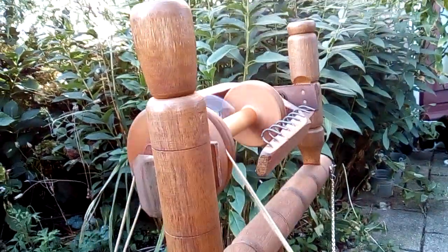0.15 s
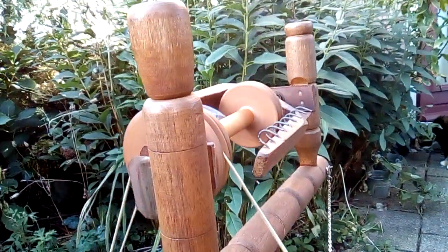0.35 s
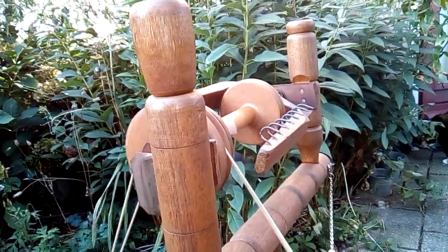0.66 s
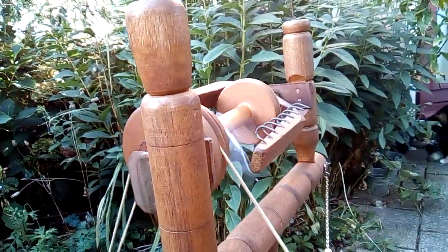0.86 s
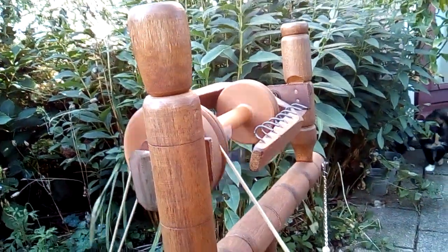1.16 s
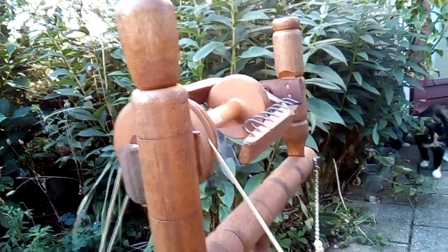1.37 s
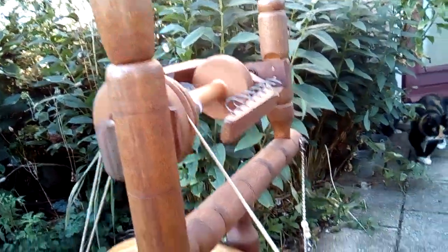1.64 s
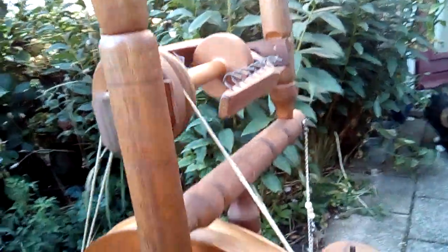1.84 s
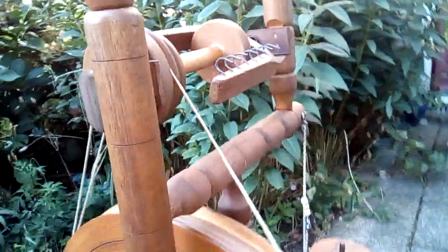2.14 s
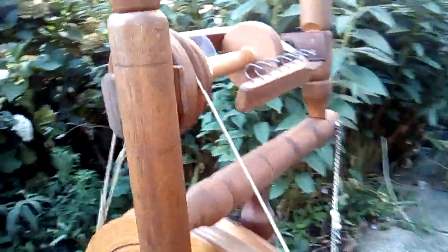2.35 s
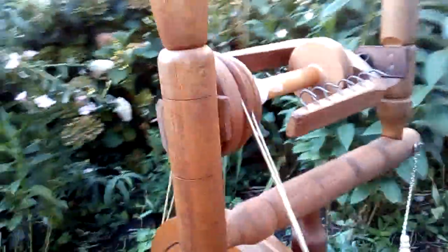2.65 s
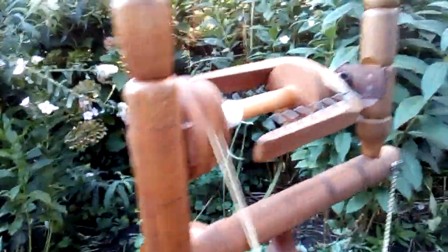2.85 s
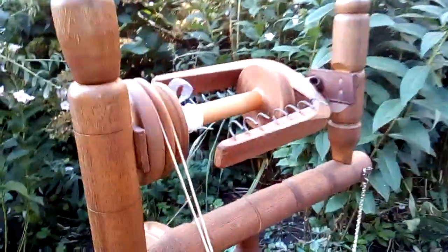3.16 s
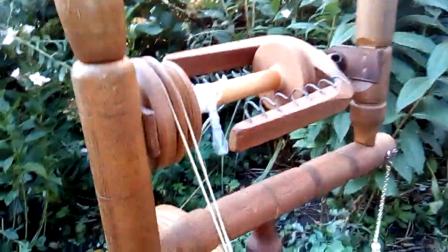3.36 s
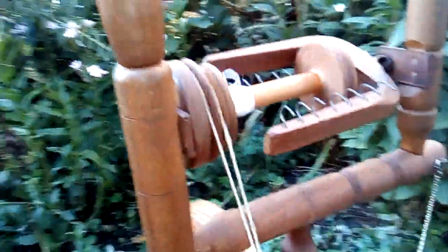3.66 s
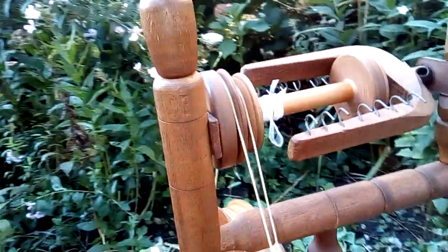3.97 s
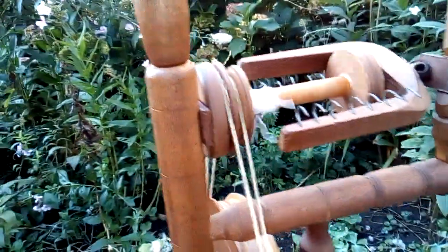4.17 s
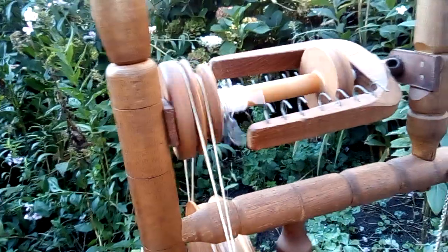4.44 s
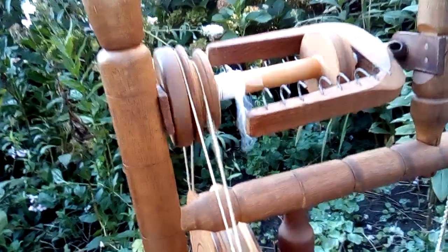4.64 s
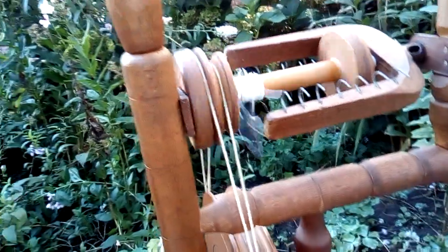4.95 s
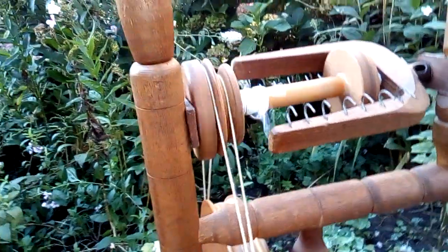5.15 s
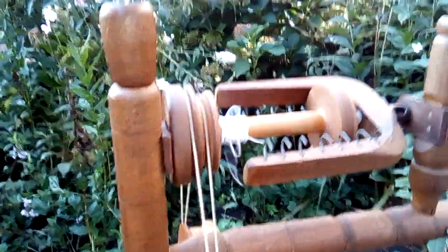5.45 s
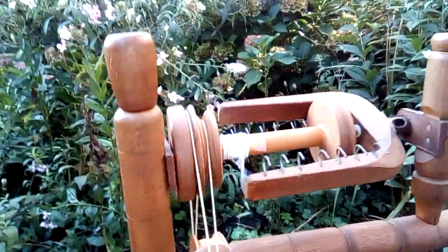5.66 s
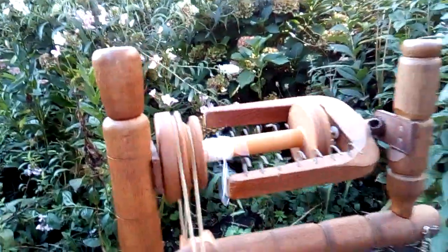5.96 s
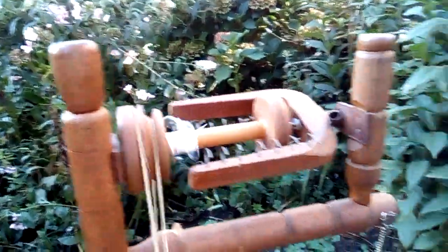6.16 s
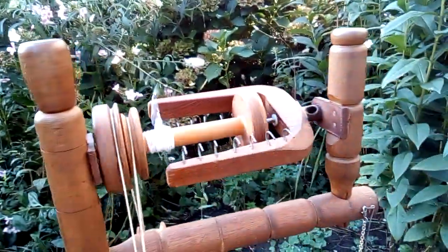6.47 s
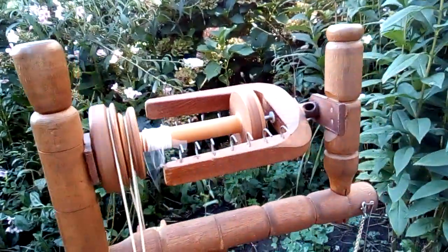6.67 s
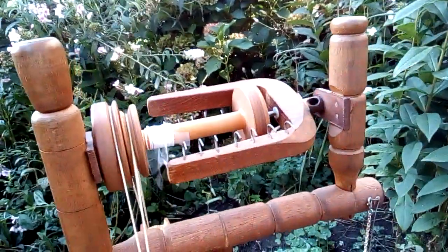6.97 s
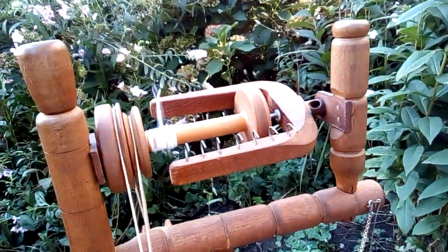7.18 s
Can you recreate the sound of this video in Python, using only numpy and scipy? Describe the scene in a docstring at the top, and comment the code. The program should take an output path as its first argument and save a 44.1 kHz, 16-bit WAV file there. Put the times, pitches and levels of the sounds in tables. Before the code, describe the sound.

Rhythmic dry wooden knocks and wiry ticks repeat about four times a second, slowing then quickening, over soft rubbing and faint distant rumble.

```python
"""Spinning wheel in a garden

A wooden spinning wheel runs close to a hand-held phone. Once a turn the loose bobbin rattles on its shaft: a heavy
blow and lighter ticks, a third of them in most turns, ring decaying modes of wood and wire hooks over soft rubbing.
The frame hums as throbbing resonant noise, bearings squeak as fluttering sines, and low cycles thump through the hand.
A shoe scuffs the paving in grainy noise, with brief treble clicks and crackle; far traffic and hiss are shaped noise."""
import sys
import numpy as np
from scipy import signal
from scipy.fft import rfft, irfft
from scipy.io import wavfile
from scipy.ndimage import uniform_filter1d

SR = 44100
rng = np.random.default_rng(int(sys.argv[2]) if len(sys.argv) > 2 else 0)


def inscribe(sig):
    """Save sig as 16-bit PCM at rate SR to the path in sys.argv[1].

    A 1-D sig is mono; a 2-D sig holds one channel per row.
    Samples are clipped to [-1, 1] before scaling.
    """
    pcm = np.round(np.clip(np.atleast_2d(sig).T, -1, 1) * 32767)
    wavfile.write(sys.argv[1], SR, pcm.astype(np.int16))


N = 322371
T = np.arange(N) / SR


def undb(db):
    """Decibels to amplitude ratio."""
    return 10 ** (np.asarray(db) / 20)


def unit(x):
    """Scale to rms 1."""
    return x / np.sqrt(np.mean(x ** 2))


def ring(x, hz, t60):
    """One mode decaying 60 dB in t60 seconds; a unit click starts a sine of height 1."""
    r, w = np.exp(-np.log(1000) / (t60 * SR)), 2 * np.pi * hz / SR
    return signal.lfilter([0, np.sin(w)], [1, -2 * r * np.cos(w), r * r], x)


def coloured(points):
    """Noise of rms 1 with the given spectrum, interpolated over log frequency."""
    hz, db = np.transpose(points)
    f = np.maximum(np.fft.rfftfreq(N, 1 / SR), 1)
    gain = undb(np.interp(np.log(f), np.log(hz), db))
    return unit(irfft(rfft(rng.standard_normal(N)) * gain, N))


def walk(rate):
    """Random levels held 1 / rate seconds and smoothed twice; rms 1."""
    k = int(SR / rate)
    steps = np.repeat(rng.standard_normal(N // k + 1), k)
    return unit(uniform_filter1d(uniform_filter1d(steps, k), k)[:N])


def swell(s, rise_ms, fall_ms):
    """Bell-shaped envelope with its own rise and fall widths."""
    width_ms = np.where(T < s, rise_ms, fall_ms)
    return np.exp(-((T - s) / width_ms * 1000) ** 2 / 2)


def body(force, modes, t60):
    """Modes of alternating sign, with the far skirts cut away as a soft wooden contact does."""
    out = sum((-1) ** k * undb(db) * ring(force, hz, t60) for k, (hz, db) in enumerate(modes))
    edges = [modes[0][0] / 1.25, modes[-1][0] * 1.3]
    return signal.sosfilt(signal.butter(2, edges, "bandpass", fs=SR, output="sos"), out)


CONTACTS_PER_S = 1500


def contacts(size, spread_db):
    """Scattered tiny impacts of either sign, a few far stronger than the rest."""
    falls = rng.random(size) < CONTACTS_PER_S / SR
    strength = undb(spread_db * np.minimum(rng.exponential(size=size), 5))
    return falls * rng.choice([-1., 1.], size) * strength + 1e-9


def lean(hz, lift_db):
    """As the phone moves, the bobbin's note gains what the deepest mode loses, nearly in full."""
    return lift_db * ((hz == DEEP[1][0]) - 0.94 * (hz == DEEP[0][0]))


DETUNE = .015  # each knock shifts the modes by this random share


def knocks(modes, t60, at, level_db, chatter_ms, lift_db, scatter_db, first=0.38):
    """A knock is a first blow and a dying chatter of bounces; it strikes the modes in its own proportions."""
    ms = np.arange(3000) / SR * 1000
    out = np.zeros(N + len(ms))
    for s, db, fade, lift in zip(at, level_db, chatter_ms, lift_db):
        draws = rng.standard_normal((len(modes), 2))
        struck = [(hz * (1 + DETUNE * shift), gain_db + scatter_db * uneven + lean(hz, lift))
                  for (hz, gain_db), (uneven, shift) in zip(modes, draws)]
        fading = np.exp(-ms / fade - (ms / fade / 2) ** 2)
        onset = 1 - np.exp(-ms / 0.34)
        force = contacts(len(ms), spread_db=2.0) * fading * onset
        force[0] = first * np.sqrt(np.sum(force ** 2))
        knock = body(force, struck, t60)
        start = int(s * SR)
        # level every knock by its energy, reckoned over 4.7 ms
        out[start:start + len(ms)] += undb(db) * knock / np.sqrt(np.sum(knock ** 2) / (0.0047 * SR))
    return out[:N]


# levels of the wood, before the view from the phone is added
# One row a turn of the flyer: first_tick_s, heavy_blow_s, second_tick_s, rattle_rise_ms,
# first_tick_db, heavy_blow_db, second_tick_db, rattle_db
TURNS = [(0.039, 0.086, 0.099, 17, -46, -39, -42.5, -51.5),
         (0.267, 0.323, 0.39, 1.8, -47.5, -38.5, -52, -45.5),
         (0.572, 0.631, 0.73, 2, -50, -39.5, -62, -53.5), (0.845, 0.893, 0.944, 2.2, -56, -35.5, -46, -47),
         (1.081, 1.126, 1.177, 3.8, -40.5, -38, -38, -42.5),
         (1.313, 1.365, 1.403, 6.8, -47, -41, -34.5, -49.5),
         (1.561, 1.616, 1.663, 26, -39.5, -36.5, -47, -47.5),
         (1.844, 1.892, 1.957, 27, -44, -39.5, -49.5, -46),
         (2.154, 2.234, 2.27, 3.4, -49, -44.5, -43.5, -63),
         (2.455, 2.508, 2.576, 21.4, -47, -41.5, -42, -46.5),
         (2.772, 2.839, 2.9, 33, -47.5, -41, -47.5, -53.5),
         (3.259, 3.278, 3.325, 39, -49, -43, -57.5, -50.5), (3.561, 3.593, 3.633, 50, -54, -50, -72, -52),
         (3.933, 3.97, 4.03, 42, -57, -44, -53, -51), (4.356, 4.423, 4.488, 43, -59, -40.5, -46.5, -51),
         (4.66, 4.702, 4.752, 22, -44.5, -39, -46.5, -49.5), (4.892, 4.934, 4.98, 29, -48, -36.5, -50, -48),
         (5.119, 5.163, 5.208, 29, -48, -38, -46.5, -46.5),
         (5.354, 5.394, 5.446, 29, -47.5, -41, -49.5, -48.5),
         (5.593, 5.644, 5.7, 25.5, -62.5, -40, -53, -47),
         (5.831, 5.868, 5.95, 29, -46.5, -36.5, -57.5, -46.5),
         (6.039, 6.076, 6.115, 15.6, -46.5, -38, -45, -46.5),
         (6.239, 6.275, 6.313, 27, -47, -39, -38.5, -45), (6.44, 6.464, 6.518, 10, -42, -38.5, -49, -46),
         (6.64, 6.669, 6.723, 20.5, -50, -42, -70, -47.5),
         (6.851, 6.883, 6.93, 24, -41.5, -36, -50.5, -47.5),
         (7.053, 7.087, 7.127, 24, -39.5, -45, -55, -51.5), (7.244, 7.273, 7.3, 15, -40, -44, -58, -46.5)]
# The third tick, in the lull after the rattle, heard in most turns: start_s, level_db
THIRD_TICKS = [(0.16, -50.5), (0.488, -46), (0.999, -48.5), (1.235, -38), (2.048, -43.5), (2.356, -51),
               (2.658, -49.5), (3.777, -54), (4.214, -48.5), (4.818, -48), (5.048, -46), (5.276, -49.5),
               (5.516, -46), (5.756, -51), (5.971, -48.5), (6.171, -41), (6.37, -48.5), (6.574, -44),
               (6.778, -44), (7.18, -43)]
# Loose bounces of the bobbin outside the pattern of the turn: start_s, level_db
BOUNCES = [(0.468, -55.5), (1.116, -48), (1.352, -50), (3.983, -63), (4.688, -50), (4.856, -51),
           (5.143, -49), (5.627, -48), (5.856, -49), (6.057, -49), (6.251, -54)]
# Hooks against wood, level_db for: first tick, heavy blow, second tick, third tick, bounce
HOOKS_AGAINST_WOOD_DB = [-7, -19, 0, -1.5, -8.5]
# How long the bobbin chatters, fade_ms for the same five kinds of knock
CHATTER_MS = [15.3, 11.7, 19.7, 18.5, 2.4]
# How far each family's rattle runs ahead, as a share of its rise: middle wood, deep wood, hooks
RATTLE_LEAD = [0, -0.51, 0.54]
# top of the rattle after the blow and its fall width, as shares of the way from first to second tick
RATTLE_LAG, RATTLE_FALL = 0.12, 0.28


def turns():
    """The bobbin's pattern: times, wood and hook levels and chatter of all knocks; rattle envelope of each family."""
    start, blow, second, rise_ms, first_db, blow_db, second_db, rattle_db = np.transpose(TURNS)
    kinds = [(start, first_db), (blow, blow_db), (second, second_db),
             np.transpose(THIRD_TICKS), np.transpose(BOUNCES)]
    at, wood_db = np.concatenate(kinds, axis=1)
    rows = [len(kind[0]) for kind in kinds]
    hooks_db = wood_db + np.repeat(HOOKS_AGAINST_WOOD_DB, rows)
    way = second - start
    tops = blow + RATTLE_LAG * way
    rattles = [sum(undb(db) * swell(s - lead * rise / 1e3, rise, 1e3 * RATTLE_FALL * span)
                   for s, rise, span, db in zip(tops, rise_ms, way, rattle_db))
               for lead in RATTLE_LEAD]
    return at, wood_db, hooks_db, np.repeat(CHATTER_MS, rows), rattles


# Modes of the middle wood, before detuning and scatter: pitch_hz, level_db
MIDDLE = [(1350, -2.5), (1600, -1.5), (1750, 1.5), (1860, 8.5), (2090, 0.5), (2350, -3.5)]
# Modes of the deep wood: pitch_hz, level_db
DEEP = [(530, -11.5), (760, -1.5), (975, -0.5), (1185, 0.5)]
# Modes of the wire hooks: pitch_hz, level_db
HOOKS = [(2830, 18.1), (3150, 17), (3620, 19.5), (3930, 15.8), (4530, 16.8), (4760, 12), (4990, 17.5),
         (5290, 16.6), (6300, 0.15)]
# Ring time of middle wood, deep wood, hooks: t60_s
RING_S = [0.016, 0.058, 0.021]
# How unevenly a contact shares its force among the modes of those three families: scatter_db
SCATTER_DB = [3.5, 4.5, 6.]
# Level of those three families in the rattle: level_db
RATTLE_SHARE_DB = [-1, 2.5, -8.5]
# Rubbing of shaft and drive band, and the wheel as heard from where the phone is:
# time_s, rubbing_db, deep_share_db, hooks_share_db, bobbin_note_lift_db (for the second deep mode)
WHIRR = [(0, -64.5, -12, -11, 7.5), (1.2, -58.5, -11.5, -9, 6.5), (2.602, -64.5, -7, -4.5, 6.5),
         (3.2, -70, -8, -8.5, 7.5), (3.75, -70, -6, -18, 2), (4.3, -70.5, -3.5, -2.5, -1),
         (4.9, -65, -6, -0.5, -3), (7.31, -58, -5, -0.5, -3)]
# One longer-ringing mode that the middle wood sets going: pitch_hz, level_db, t60_s
SHAFT_NOTE = (1767.6, -34.5, 0.026)


def wheel():
    """Close to the phone: knocks, rattles and soft rubbing excite each family of decaying modes."""
    out = 0
    uneven = undb(2.8 * walk(140))
    catching_db = 3.1 * np.tanh(walk(60))
    grit = contacts(N, spread_db=2.5)  # the same impacts ring both families of wood
    s, rubbing_db, deep_share_db, hooks_share_db, lift_db = np.transpose(WHIRR)
    at, wood_db, hooks_db, chatter_ms, rattles = turns()
    blows_db = [wood_db, wood_db, hooks_db]
    view_db = [0 * s, deep_share_db, hooks_share_db]
    shake_db = [0 * s, 0.95 * deep_share_db, hooks_share_db]
    lift = np.interp(T, s, lift_db)
    for k, (modes, share_db) in enumerate([(MIDDLE, 0), (DEEP, -5), (HOOKS, -6.5)]):
        # the point of contact wanders, so each mode comes and goes
        wander = [(hz, db + (SCATTER_DB[k] + 0.5) * np.tanh(1.73 * walk(45)) + lean(hz, lift))
                  for hz, db in modes]
        shake = rattles[k] * undb(RATTLE_SHARE_DB[k] + np.interp(T, s, shake_db[k]))
        rub_db = np.interp(T, s, rubbing_db + 0.62 * shake_db[k]) + share_db
        rub = undb(rub_db + catching_db + 3.1 * np.tanh(walk(25)))
        if modes is HOOKS:  # the wire hooks jingle on their own, the shortest ones most
            grit = contacts(N, spread_db=3.5)
            uneven = undb(4.84 * walk(70))
            wander = [(hz, db + 3.2 * (hz > 4200)) for hz, db in wander]
        push = shake * uneven + rub
        rms = np.std(body(grit, wander, RING_S[k]))
        level_db = blows_db[k] + np.interp(at, s, view_db[k])
        knock_lift_db = np.interp(at, s, lift_db)
        struck = knocks(modes, RING_S[k], at, level_db, chatter_ms, knock_lift_db, SCATTER_DB[k])
        family = struck + body(grit * push, wander, RING_S[k]) / rms
        if modes is MIDDLE:
            note_hz, note_db, note_t60 = SHAFT_NOTE
            family = family + undb(note_db) * ring(family, note_hz, note_t60)
        out = out + family
    # a faint spray of treble follows the hooks, the last family
    loudness = uniform_filter1d(np.abs(family), size=120)
    spray = loudness * unit(ring(rng.standard_normal(N), 10400.0, 0.0018))
    return out + undb(-32.0) * spray


# Low hum of the frame under the drive band, before its throbs: time_s, level_db
FRAME_HUM = [(0, -72.5), (1.2, -74), (2.9, -72), (3.9, -72.5), (4.6, -62.5), (5.5, -64.5), (7.31, -57.5)]
FRAME_HZ, FRAME_RING_S = 344.5, 0.044
FRAME_SHAKE_DB = -17  # how strongly the deep wood's rattle shakes the frame


def frame():
    """Noise through two resonances on one low note hums in uneven throbs, louder with each rattle."""
    hum = ring(ring(rng.standard_normal(N), FRAME_HZ, FRAME_RING_S), FRAME_HZ, 0.019)
    steady = undb(np.interp(T, *np.transpose(FRAME_HUM)) + 6.3 * np.tanh(walk(9)))
    deep_rattle = turns()[-1][1]
    return (steady + undb(FRAME_SHAKE_DB) * deep_rattle) * unit(hum)


# Low rumble of distant traffic, before it wavers: time_s, level_db
RUMBLE = [(0, -66.5), (1.2, -59.5), (2.9, -61), (3.4, -57), (4.4, -55), (5.2, -64.5), (6.2, -55),
          (7.31, -61)]
# Spectrum of the rumble: frequency_hz, level_db (per Hz)
RUMBLE_COLOUR = [(20, -48), (40, 6), (80, 5.5), (140, 5.5), (240, -17.5), (450, -17), (2000, -80)]
# Spectrum of the hiss: frequency_hz, level_db (per Hz)
HISS_COLOUR = [(300, -16.5), (5000, -14), (8000, -31), (13000, -35.5), (14800, -30)]
HISS_DB, HISS_WAVER_DB = -71, 1.


def garden():
    """Far traffic and air as shaped noise wavering in the bass, and a faint hiss that wavers slowly."""
    rumble_db = np.interp(T, *np.transpose(RUMBLE)) + 6.1 * np.tanh(walk(10)) + 2.4 * walk(30)
    rumble = undb(rumble_db) * coloured(RUMBLE_COLOUR)
    hiss = undb(HISS_DB + HISS_WAVER_DB * walk(6)) * coloured(HISS_COLOUR)
    return rumble + hiss


# Dull thumps reaching the microphone through the hand: start_s, level_db, pitch_hz
THUMPS = [(0.214, -41.5, 81), (0.277, -42, 69.5), (3.195, -34, 113), (3.219, -33.5, 131.5),
          (3.25, -36.5, 96), (3.761, -35, 193), (3.975, -40, 92), (4.441, -27, 62.6), (4.453, -28.5, 107),
          (4.763, -35, 95), (4.893, -32, 74), (5.522, -36, 83), (5.897, -31, 65), (6.09, -29, 64),
          (6.182, -31.5, 151), (6.271, -23, 111), (6.295, -27, 111), (6.449, -32, 76.5),
          (6.572, -31.5, 81.5), (6.68, -30.5, 125), (6.697, -29, 72), (6.862, -33.5, 86.5),
          (7.056, -25, 94), (7.086, -29.5, 128), (7.112, -27, 140), (7.196, -28.5, 141),
          (7.213, -19.5, 108), (7.275, -28, 63.5)]


def thumps(t60=0.089, push_ms=2.33):
    """Soft pushes on the case ring a few low cycles, with an overtone."""
    out = np.zeros(N)
    push = np.hanning(int(push_ms * SR / 1000) + 3)
    for s, db, hz in THUMPS:
        start = int(s * SR)
        force = np.zeros(min(N - start, SR // 4))
        force[:len(push)] = push / push.sum()
        overtone = undb(-5.5) * ring(force, 1.83 * hz, 0.028)
        out[start:start + len(force)] += undb(db) * (ring(force, hz, t60) - overtone)
    return out


# Faint bearing squeaks: top_s, level_db, width_ms (of the bell, each side), pitch_hz (its centre)
SQUEAKS = [(4.2, -62.5, 260, 1400), (0.614, -66, 34, 4350), (4.1, -67, 1200, 2140)]


def squeaks():
    """Friction that nearly sings: a sine with drifting pitch, fluttering in level with low resonant noise."""
    out = 0
    for s, db, ms, hz in SQUEAKS:
        flutter = unit(ring(rng.standard_normal(N), 40., 0.038))
        note = np.sin(2 * np.pi * np.cumsum(hz * (1 + 0.025 * walk(6))) / SR)
        out = out + undb(db) * swell(s, ms, ms) * flutter * note
    return out


# Brittle treble clicks: top_s, level_db, fall_ms
CLICKS = [(1.806, -64, 2.7), (1.866, -54, 2.2), (1.873, -53, 8.9), (2.666, -54, 2)]


def clicks():
    """Sudden bursts of band-limited treble noise that die at once."""
    shape = sum(undb(db) * swell(s, 0.13, fall) for s, db, fall in CLICKS)
    band = signal.butter(2, [5000., 11500.], "bandpass", fs=SR, output="sos")
    return shape * unit(signal.sosfilt(band, rng.standard_normal(N)))


# Shoe scuffs on the paving; rise and fall are those of the middle band:
# top_s, level_db, rise_ms, fall_ms, dull_share_db, treble_share_db
SCUFFS = [(2.675, -49, 23.5, 36, -4, 2), (3.01, -57.5, 37, 48, -4, -26), (3.59, -45.5, 32.5, 38, 8.5, 3.5)]
# Spectrum of the grit, before it is split in bands: frequency_hz, level_db (per Hz)
SCUFF_COLOUR = [(300, 0.5), (700, -8), (1800, -3.5), (5000, -4.5), (8500, -28.5), (13000, -27.5),
                (15000, -24)]


def scuffs():
    """Grit under a sole: grainy noise swells and stops, dull only as the weight lands, treble just after."""
    grit = coloured(SCUFF_COLOUR) * undb(1.2 * walk(200))
    dull = signal.sosfilt(signal.butter(3, 900., fs=SR, output="sos"), grit)
    middle = signal.sosfilt(signal.butter(3, [1100., 8000.], "bandpass", fs=SR, output="sos"), grit)
    treble = signal.sosfilt(signal.butter(4, 8500., "highpass", fs=SR, output="sos"), grit)
    out = 0
    for s, db, rise, fall, dull_db, treble_db in SCUFFS:
        out = out + undb(db) * swell(s, rise, fall) * middle
        out = out + undb(db + treble_db) * swell(s + 0.029, rise, 0.5 * fall) * treble
        out = out + undb(db + dull_db) * swell(s, 0.26 * rise, 0.77 * fall) * dull
    return out


# Thin crackle at the very top: top_s, level_db
CRACKLE = [(2.667, -50), (4.89, -64), (6.21, -66)]


def crackle():
    """Short bursts of noise through two resonances in the highest band only."""
    shape = sum(undb(db) * swell(s, 1.5, 19.0) for s, db in CRACKLE)
    return shape * unit(ring(ring(rng.standard_normal(N), 15200.0, 0.0011), 16300.0, 0.0011))


def scene():
    """All sources summed to one channel."""
    machine = wheel() + frame() + squeaks()
    around = garden() + thumps() + clicks() + scuffs() + crackle()
    return (machine + around)[None]


TOP_HZ = 15650


def record(dry):
    """The deepest bass below about 45 Hz is removed; the phone cuts the top."""
    dry = signal.sosfilt(signal.butter(2, 45., "highpass", fs=SR, output="sos"), dry)
    return signal.sosfilt(signal.ellip(10, .2, 80, TOP_HZ, fs=SR, output="sos"), dry)


dry = scene()
out = record(dry)
inscribe(out)
```